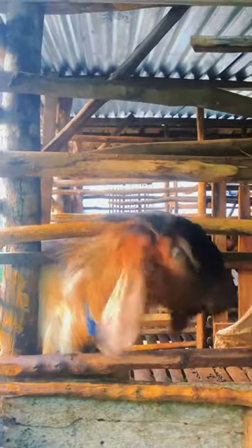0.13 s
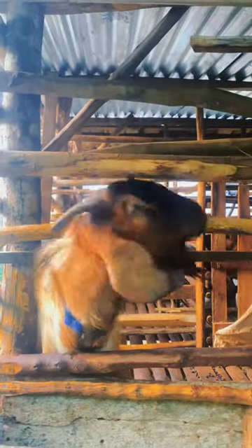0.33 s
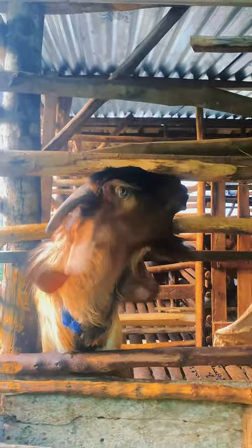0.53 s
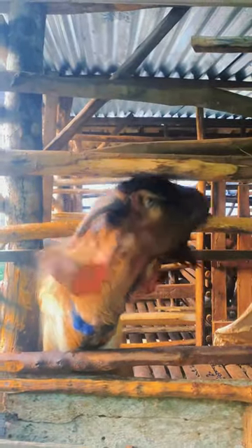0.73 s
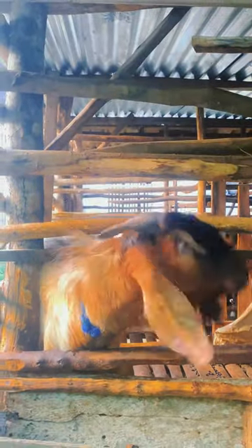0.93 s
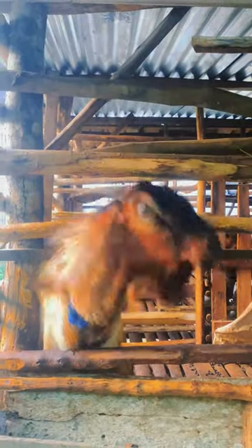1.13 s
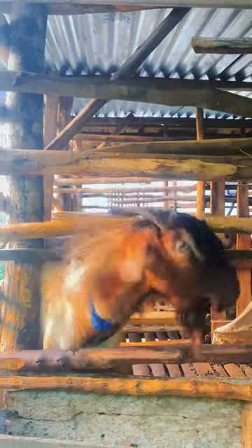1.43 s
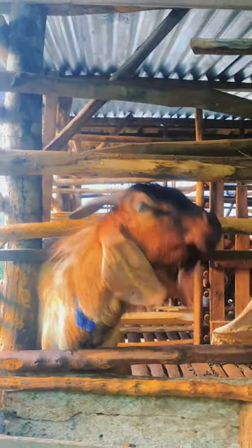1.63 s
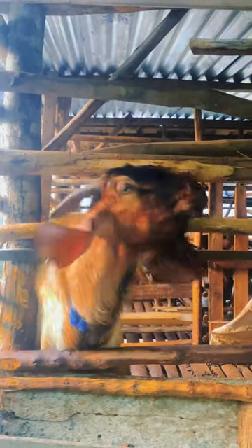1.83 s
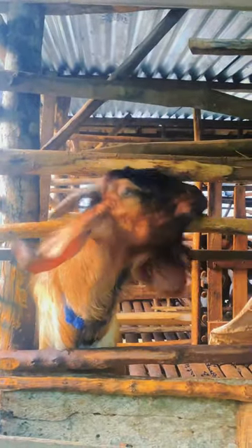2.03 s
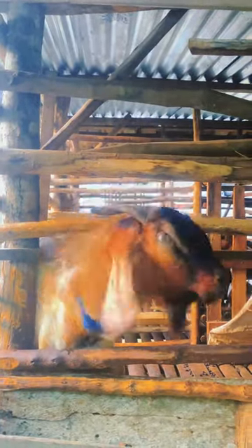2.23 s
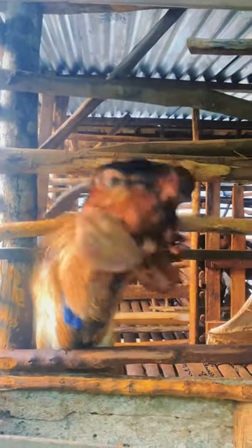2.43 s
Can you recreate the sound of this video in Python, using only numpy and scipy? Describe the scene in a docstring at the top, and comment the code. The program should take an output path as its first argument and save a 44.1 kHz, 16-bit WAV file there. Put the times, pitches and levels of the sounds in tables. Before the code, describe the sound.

One goat bleats once, a nasal, fast-pulsing call, in a wooden pen with a tin roof. A snap and soft bumps come before, board thuds and faint bird peeps after, over low outdoor hum; fairly close stereo microphone.

```python
"""First a dry snap and two bumps are heard over stirred litter, outdoor air and a far engine's drone.
Then a goat in a wooden pen under a tin roof gives one quavering bleat of nine pulses.
The bleat is a stack of harmonics shaped by the throat, plus noisy rasp, echoes and the pen's ring.
Bumps are ringing boards and bursts of noise; litter and air are coloured noise.
The engine is a stack of wavering hums, and a small bird's faint peeps are falling whistles."""
import sys
import numpy as np
from scipy import signal
from scipy.fft import rfft, irfft, next_fast_len
from scipy.io import wavfile

SR = 44100
rng = np.random.default_rng(int(sys.argv[2]) if len(sys.argv) > 2 else 0)


def store_pcm(level_fs):
    """Save levels as 16-bit WAV."""
    pcm = np.round(np.clip(level_fs, -1, 1) * 32767).astype(np.int16)
    wavfile.write(sys.argv[1], SR, np.atleast_2d(pcm).T)


N = 113778
T = np.arange(N) / SR  # the time of every sample, in seconds

# Decibels in the tables are relative: each layer adds its parts together.
# Pulses of the bleat: (crest time [s], crest pitch before jitter [Hz], level [dB], pitch sag [share],
# full level before crest [s], full level after crest [s], treble [dB], mouth closing [0-1],
# rasp [dB], pitch jitter [share])
BLEAT_PULSES = [(0.6102, 361.99, -31.3984, 0.0911, -0.0003, 0.0022, -9.1681, 0.0, -15.0, 0.004),
                (0.7182, 411.299, -32.6748, 0.1487, 0.0342, 0.0092, 0.2541, 0.0521, -13.0, 0.004),
                (0.8109, 419.486, -31.5951, 0.1388, 0.0399, 0.02, -0.0137, 0.0363, -13.0, 0.005),
                (0.9101, 433.593, -29.4884, 0.1815, 0.031, 0.021, -1.1369, 0.0736, -16.0, 0.003),
                (1.0035, 433.817, -28.7509, 0.165, 0.0325, 0.0218, -1.0171, 0.1413, -16.0, 0.003),
                (1.0981, 433.118, -28.8683, 0.163, 0.0306, 0.0203, -0.9082, 0.0702, -16.0, 0.003),
                (1.1981, 421.397, -30.6764, 0.1459, 0.0373, 0.0237, -1.8034, 0.1599, -16.0, 0.004),
                (1.2999, 408.145, -30.0013, 0.1479, 0.0362, 0.0168, -2.3312, 0.2673, -15.0, 0.004),
                (1.3908, 322.462, -40.0521, 0.0298, 0.0137, 0.0124, 0.7076, 1.0, -8.0, 0.014)]
# Thin squeaks as the voice catches: (time [s], pitch [Hz], level [dB])
VOICE_SQUEAKS = [(0.676, 2736, -48), (.762, 2615, -44.5)]
# Throat resonances with the mouth open: (frequency [Hz], gain [dB])
THROAT_OPEN = [(350.0, -22.0), (620.0, -25.0), (790.0, -19.6), (880.0, -17.8), (1000.0, -15.8),
               (1100.0, -0.3), (1160.0, -6.6), (1210.0, 3.4), (1260.0, -0.4), (1320.0, -10.3),
               (1550.0, -27.1), (1750.0, -15.0), (2000.0, -22.2), (2250.0, -18.3), (2420.0, -9.9),
               (2560.0, -3.4), (2750.0, -11.9), (3050.0, -20.6), (3300.0, -12.7), (3480.0, -12.3),
               (3800.0, -31.7), (4600.0, -39.8), (5400, -51), (8000, -62)]
# Throat resonances with the mouth closing: (frequency [Hz], gain [dB])
THROAT_CLOSED = [(320.0, -3.9), (650.0, -5.0), (970.0, -0.5), (1300.0, -3.6), (1620.0, -8.8),
                 (1940.0, -5.5), (2270.0, -27.4), (2600.0, -13.1), (3200.0, -25.0), (4200.0, -18.2),
                 (5400.0, -55.0)]
# Colour of the voice's rasp: (frequency [Hz], density [dB per Hz])
RASP_COLOUR = [(400, 0.5), (900, -3), (1220, 18.5), (1500, -8.5), (2100, -3.5), (2650, 6.5), (3050, -1.5),
               (3450, 1), (4000, -0.5), (4700, -17), (5400, -30), (7500, -22.5), (9000, -67)]
# The goat's level at the two microphones: (frequency [Hz], left minus right [dB])
GOAT_BALANCE_CURVE = [(350, -4), (680, -5.5), (850, 1.5), (1150, 14.5), (1700, 8.5), (2150, 4.5), (2550, 6),
                      (2900, -0.5), (4400, 1.5)]
# The goat's phase at the two microphones: (frequency [Hz], left lead [radians])
GOAT_LEAD_CURVE = [(500, 0.072), (830, 2.36), (1200, 2.43), (1750, 0.93), (2500, 2.7), (3050, 2.14),
                   (3300, .8), (4400, 2.5)]
# Reflections from floor, posts and roof: (delay [s], level [dB])
EARLY_ECHOES = [(0.00846, -12.7), (0.01008, -11.9), (0.02121, -18.1), (0.02671, -10.3), (0.02704, -15.1)]
# Bumps: (time [s], knock [dB], boom [dB], clack [dB], time for the boom to fall 60 dB [s])
BOARD_BUMPS = [(0.043, -48, -62, -73, 0.32), (.091, -48.5, -60.5, -42.5, 0.37),
               (0.868, -47, -73.5, -41, 0.77), (1.197, -52, -53, -45.5, 0.31),
               (1.417, -41, -41.5, -46, 1.1), (2.168, -36, -34.5, -54, 0.44),
               (2.255, -53.5, -39, -70, 0.26)]
# Ringing tones of the boards: (frequency [Hz], level [dB], time to fall 60 dB [s])
BOARD_TONES = [(274, -11.5, 0.087), (285.4, 6.5, 0.17), (341.7, 0, 0.24), (374, -6.5, 0.23),
               (513, -7, 0.16), (568, -6.5, 0.15), (670, -6.5, 0.16)]
# Boom of the floor frame: (frequency [Hz], density [dB per Hz])
BOOM_COLOUR = [(22, 5.5), (40, 1.5), (64, 0), (95, 0), (130, 3.5), (190, -14.5), (400, -9), (1000, -81)]
# Clack of a hard contact: (frequency [Hz], density [dB per Hz])
CLACK_COLOUR = [(200, 5), (600, -2), (1050, 4.5), (1500, -21), (3000, -36.5), (5000, -28.5), (9000, -57.5)]
# Loudness of the stirred litter: (time [s], level [dB])
LITTER_LOUDNESS = [(0, -52.5), (.15, -60), (.3, -56), (.5, -67.5), (1.3, -57.5), (1.52, -62), (1.83, -56.5),
                   (1.95, -60), (2.12, -58.5), (2.55, -58.5)]
# Colour of the litter: (frequency [Hz], density [dB per Hz])
LITTER_COLOUR = [(300, 14.5), (700, 6.5), (1200, 10.5), (2300, 7), (3500, 5), (4700, -1), (5500, -14.5),
                 (7600, -8.5), (9000, -33)]
# Dry snaps: (time [s], level [dB], time to fall 60 dB [s], upper limit [Hz])
DRY_SNAPS = [(.008, -46.5, 0.13, 5240), (1.865, -42, 0.037, 14000), (1.877, -52, 0.091, 10900),
             (2.166, -45.5, 0.12, 4030)]
# Colour of the snaps: (frequency [Hz], density [dB per Hz])
SNAP_COLOUR = [(300, -27), (800, 7.5), (1300, 4.5), (2500, 7), (3600, 1.5), (4700, -3), (5600, -12),
               (8000, -21), (12000, -13.5), (16000, -45)]
# Engine speed: (time [s], firing rate [per s])
FIRING_RATE = [(0, 36.2), (.4, 36.3), (1.0, 37.3), (1.9, 37.6), (2.58, 38.2)]
# Hums of the engine: (multiple of the firing rate [count], level [dB])
ENGINE_HUMS = [(2, -69.5), (3, -63), (4, -54), (5, -56), (6, -60.5), (7, -57), (8, -58), (9, -62.5),
               (11, -60.5), (12, -57), (13, -72)]
# Swells of single hums: (multiple [count], peak time [s], half length [s], rise [dB])
ENGINE_SWELLS = [(4, 1.12, .2, 9), (5, 0.45, 0.23, 6), (6, 0.92, 0.32, 10), (7, 1.15, 0.42, 5.5),
                 (7, 1.757, 0.15, 10.5)]
# Loudness of the whole engine: (time [s], level [dB])
ENGINE_LOUDNESS = [(0, -0.5), (.6, 0.5), (1.2, -0.5), (1.7, 2.5), (1.9, 1), (2.1, -1.5), (2.4, 3),
                   (2.58, 1.5)]
# Bird peeps: (start time [s], length [s], start pitch [Hz], end pitch [Hz], level [dB])
BIRD_PEEPS = [(0.452, 0.048, 3810, 3660, -66), (1.458, 0.054, 3347, 2960, -61),
              (1.57, 0.052, 4520, 3830, -56.5), (1.736, .06, 4563, 4030, -55),
              (2.441, 0.12, 4020, 3430, -64)]
# Colour of the outdoor background: (frequency [Hz], density [dB per Hz])
AIR_COLOUR = [(20, -13.5), (36, -6), (70, -3), (140, -4), (300, -8.5), (450, -10.5), (560, -15.5),
              (800, -23), (1200, -41.5), (2500, -47.5), (4600, -32), (5400, -55.5), (7600, -42),
              (8800, -113), (15000, -37.5)]
# Loudness of the outdoor background: (time [s], level [dB])
AIR_LOUDNESS = [(0, 5), (.8, 4.5), (1.2, 6), (1.37, 4.5), (1.65, 3), (1.85, 3), (2.1, 3.5), (2.35, 4),
                (2.58, 8.5)]
# How alike left and right are in stereo noise: (frequency [Hz], likeness [0-1])
STEREO_LIKENESS = [(60, 1), (300, 0.93), (600, 0.47), (1200, 0.089), (3000, 0.15), (8000, 0.11)]

CLIMB_S, DROP_S = .047, .021  # pitch before and after each crest
ATTACK_S, RELEASE_S, CLOSED_FADE_S = .017, .004, .012  # a closing mouth lengthens the release
RASP_ATTACK_S, RASP_RELEASE_S = 0.023, 0.013
SQUEAK_S = 0.015
JITTER_RATE_HZ, SHIMMER_DB = 300, 1.0  # chance changes of pitch and level
TONE_DB, RASP_DB, SAG_DULLS_DB = -1.5, -4, 10.5
PUFF_DEPTH = .7
ECHO_TOP_HZ = 3040  # reflections lose their treble
PEN_T60_S, PEN_DB = .32, -19
TIN_FROM_HZ, TIN_DB = 3430, 4.5  # the tin roof throws back the treble
BOOM_RISE_S, CLACK_T60_S = 0.027, .08
ENGINE_WAVER_DB, ENGINE_WANDER_RAD = 2.5, .05  # the wander is per multiple
PEEP_BEND, PEEP_WET_DB = 4, -1  # a higher bend holds the pitch longer
PEEP_LOWER_RATIO, PEEP_LOWER_DB, PEEP_WAVER_SHARE = .82, -8, .004
AIR_DB = -52
LOW_CUT_HZ, TOP_CUT_HZ = 37, 15000


def goat():
    """The voice and rasp leave the throat, then echo and ring in the pen."""
    voice, puffs = bleat()
    voice += squeaks()
    call = through(voice + rasp(puffs), goat_path)
    treble = through(call, lambda hz: 1 - 1 / (1 + (hz / TIN_FROM_HZ) ** 6))
    return call + pen(call, PEN_DB) + pen(treble, TIN_DB)


def bleat():
    """Pitch climbs and drops faster in each pulse, sweeping harmonics through the throat's resonances."""
    voice, puffs = np.zeros((2, N))
    wobble, shimmer = drift(JITTER_RATE_HZ), from_db(SHIMMER_DB * drift(63))
    k = np.arange(1, 13)[:, None]  # twelve harmonics
    for crest, pitch, db, sag, lead, hold, treble_db, closing, rasp_db, jitter in BLEAT_PULSES:
        near = np.abs(T - crest) < .1
        t = T[near] - crest
        closing = np.clip(closing, 0, 1)

        # Slack is 0 at the crest and approaches 1 away from it
        slack = 1 - np.exp(-(t / np.where(t < 0, CLIMB_S, DROP_S)) ** 2)
        hz = pitch * (1 + jitter * wobble[near]) * (1 - sag * slack)
        turn = 2 * np.pi * np.cumsum(hz) / SR

        early, late = np.maximum(-t - lead, 0), np.maximum(t - hold, 0)
        release = RELEASE_S + CLOSED_FADE_S * closing ** 2
        level = from_db(db) * shimmer[near] * np.exp(-(early / ATTACK_S) ** 2 - late / release)

        open_colour = (1 - closing) * at_hz(THROAT_OPEN, k * hz)
        colour = open_colour + closing * at_hz(THROAT_CLOSED, k * hz)
        in_treble = at_hz([(1300, 0), (1500, 1)], k * hz)
        colour += (treble_db - SAG_DULLS_DB * slack) * in_treble
        voice[near] += level * np.sum(from_db(TONE_DB + colour) * np.sin(k * turn), axis=0)

        breath = np.exp(-(early / RASP_ATTACK_S) ** 2 - late / RASP_RELEASE_S)
        # One puff for each cycle of the voice
        puffs[near] += from_db(db + RASP_DB + rasp_db) * breath * (1 + PUFF_DEPTH * np.cos(turn))
    return voice, puffs


def squeaks():
    """Thin steady tones rise and fade smoothly as the voice catches."""
    out = np.zeros(N)
    for s, hz, db in VOICE_SQUEAKS:
        out += from_db(db) * np.exp(-((T - s) / SQUEAK_S) ** 2) * np.sin(2 * np.pi * hz * T)
    return out


def rasp(puffs):
    """Rough breath: noise puffed out every cycle and coloured."""
    def colour(hz):
        gain = from_db(at_hz(RASP_COLOUR, hz))
        return gain / np.sqrt(np.mean(gain ** 2))
    return through(puffs * rng.standard_normal(N), colour)


def goat_path(hz):
    """Direct sound and dulled early echoes, reaching each microphone with its own level and phase."""
    echoes = sum(from_db(db) * np.exp(-2j * np.pi * hz * delay) for delay, db in EARLY_ECHOES)
    path = 1 + echoes / (1 + (hz / ECHO_TOP_HZ) ** 4)
    right = from_db(-at_hz(GOAT_BALANCE_CURVE, hz)) * np.exp(-1j * at_hz(GOAT_LEAD_CURVE, hz))
    # The last factor keeps the two sides' total power steady
    return path * np.array([np.ones_like(right), right]) * np.sqrt(2 / (1 + np.abs(right) ** 2))


def pen(x, wet_db):
    """The diffuse ring of the pen: the sound smeared by a dying burst of noise."""
    tail = rng.standard_normal((2, SR // 2)) * blow(0.0017, PEN_T60_S, 0.0085)[:SR // 2]
    tail /= np.sqrt(np.sum(tail ** 2, axis=1, keepdims=True))
    return from_db(wet_db) * signal.fftconvolve(x, tail, axes=1)[:, :N]


def bumps():
    """A clack at the contact, ringing boards, then the slower boom of the frame."""
    out, boom, clack = np.zeros((2, N)), noise(BOOM_COLOUR), noise(CLACK_COLOUR)
    for s, knock_db, boom_db, clack_db, boom_t60 in BOARD_BUMPS:
        for hz, db, t60 in BOARD_TONES:
            out += from_db(knock_db + db) * blow(s, t60, 0.0033) * np.sin(2 * np.pi * hz * (T - s))
        out += from_db(boom_db) * blow(s, boom_t60, BOOM_RISE_S) * boom
        out += from_db(clack_db) * blow(s, CLACK_T60_S, 0.006) * clack
    return out


def litter():
    """Grainy rustling: noise with a fluttering level, and a few dry snaps."""
    flutter_db = 2.3 * drift(36)
    out = from_db(in_time(LITTER_LOUDNESS) + flutter_db) * noise(LITTER_COLOUR)
    crack = noise(SNAP_COLOUR)
    for s, db, t60, top_hz in DRY_SNAPS:
        dulled = through(crack, lambda hz: 1 / (1 + (hz / top_hz) ** 4))
        out += from_db(db) * blow(s, t60, .0015) * dulled
    return out


def engine():
    """Multiples of a slowly rising firing rate; each wavers in level and phase, and some swell."""
    out = np.zeros(N)
    turn = 2 * np.pi * np.cumsum(in_time(FIRING_RATE)) / SR
    for k, db in ENGINE_HUMS:
        swell_db = sum(rise * np.exp(-((T - s) / width) ** 2)
                       for multiple, s, width, rise in ENGINE_SWELLS if multiple == k)
        level = from_db(db + swell_db + ENGINE_WAVER_DB * drift(5))
        phase = 2 * np.pi * rng.random() + ENGINE_WANDER_RAD * k * drift(2.7)
        out += level * np.sin(k * turn + phase)
    return np.sqrt(2) * from_db(in_time(ENGINE_LOUDNESS)) * out


def bird():
    """Thin two-voiced whistles that hold, then fall, blurred by distance."""
    out, waver = np.zeros(N), 1 + PEEP_WAVER_SHARE * drift(130)
    for s, length, start_hz, end_hz, db in BIRD_PEEPS:
        u = np.clip((T - s) / length, 0, 1)  # progress through the peep
        hz = waver * (start_hz + (end_hz - start_hz) * u ** PEEP_BEND)
        turn = 2 * np.pi * np.cumsum(hz) / SR
        whistle = np.sin(turn) + from_db(PEEP_LOWER_DB) * np.sin(PEEP_LOWER_RATIO * turn)
        out += from_db(db) * np.sqrt(2 * u * (1 - u)) * whistle
    return out + pen(np.array([out, out]), PEEP_WET_DB)


def air():
    """The outdoor background: coloured noise with a slowly changing level."""
    return from_db(AIR_DB + in_time(AIR_LOUDNESS)) * noise(AIR_COLOUR)


def from_db(db):
    """Decibels to gain."""
    return 10 ** (np.asarray(db) / 20)


def rms_one(x):
    """Scale to an average strength (rms) of 1."""
    return x / np.sqrt(np.mean(x ** 2) + 1e-20)


def in_time(rows):
    """Read a table of times and values at every sample."""
    return np.interp(T, *np.transpose(rows))


def at_hz(points, hz):
    """Read a table on a log-frequency axis."""
    f, v = np.transpose(points)
    return np.interp(np.log(np.maximum(hz, 1)), np.log(f), v)


def through(x, response):
    """Filter by a response given as a function of Hz."""
    size = next_fast_len(N + SR // 2)
    hz = np.arange(size // 2 + 1) * SR / size
    return irfft(rfft(x, size) * response(hz), size)[..., :N]


def drift(rate):
    """Random wander of spread 1, weaker above the given rate in Hz."""
    return rms_one(through(rng.standard_normal(N), lambda hz: 1 / (1 + (hz / rate) ** 2)))


def noise(spectrum):
    """Coloured stereo noise, alike in the bass and wider in the treble."""
    def alike(hz):
        return np.clip(at_hz(STEREO_LIKENESS, hz), 0, 1)
    mid, side = rng.standard_normal((2, N))
    mid = through(mid, lambda hz: from_db(at_hz(spectrum, hz)) * np.sqrt(1 + alike(hz)))
    side = through(side, lambda hz: from_db(at_hz(spectrum, hz)) * np.sqrt(1 - alike(hz)))
    return rms_one(np.array([mid + side, mid - side]))


def blow(start, t60, rise):
    """Envelope that rises evenly, then falls 60 dB in every t60 seconds."""
    age = np.maximum(T - start, 0)
    return np.minimum(age / rise, 1) * np.exp(-np.log(1000) * np.maximum(age - rise, 0) / t60)


def scene():
    """The goat over the sounds of the yard, which lean slightly to the right."""
    yard = bumps() + litter() + engine() + bird() + air()
    return goat() + yard * from_db([[-.5], [.5]])


def record(dry):
    """The deepest bass and the top are cut."""
    dry = signal.sosfilt(signal.butter(6, LOW_CUT_HZ, "high", fs=SR, output="sos"), dry)
    return signal.sosfilt(signal.cheby2(12, 70, TOP_CUT_HZ, fs=SR, output="sos"), dry)


dry = scene()
out = record(dry)
store_pcm(out)
```